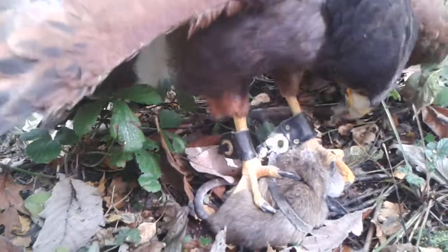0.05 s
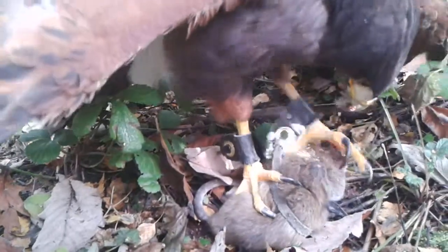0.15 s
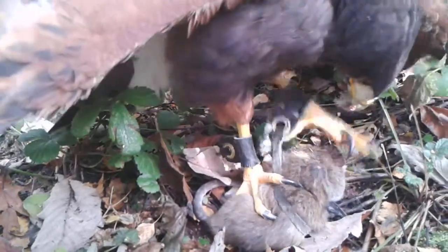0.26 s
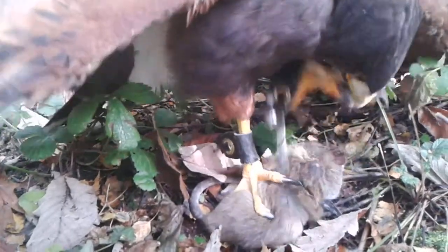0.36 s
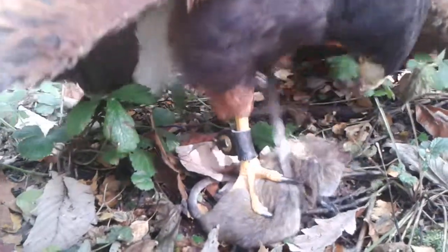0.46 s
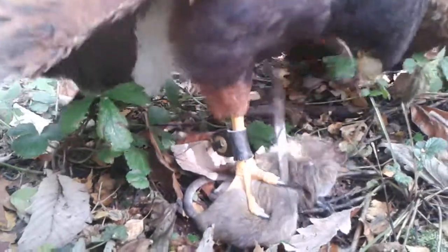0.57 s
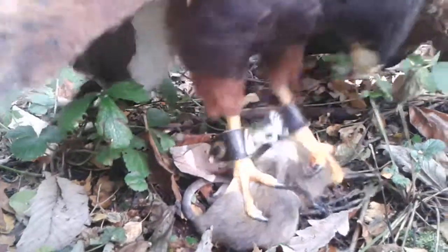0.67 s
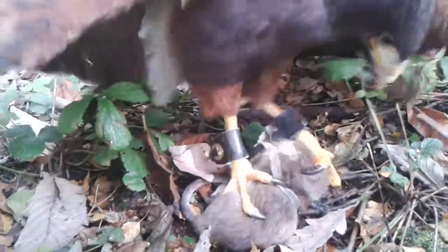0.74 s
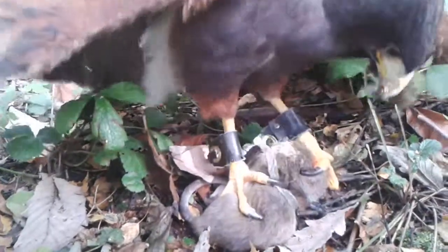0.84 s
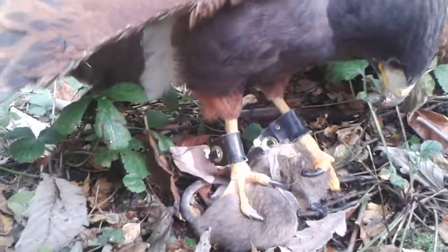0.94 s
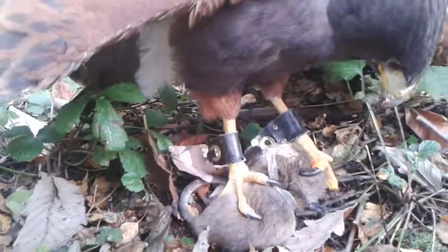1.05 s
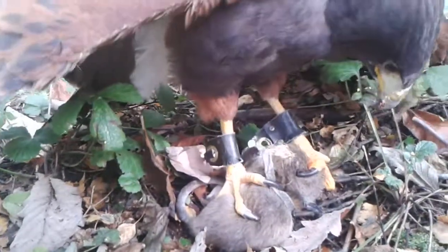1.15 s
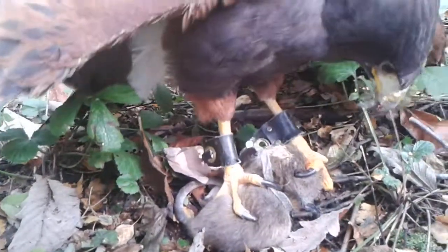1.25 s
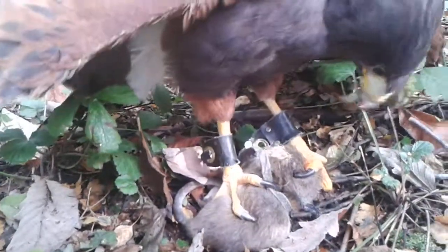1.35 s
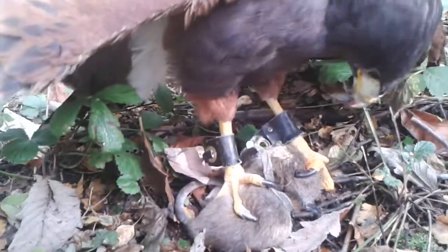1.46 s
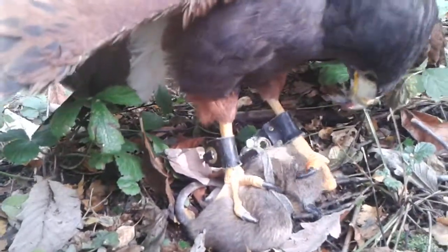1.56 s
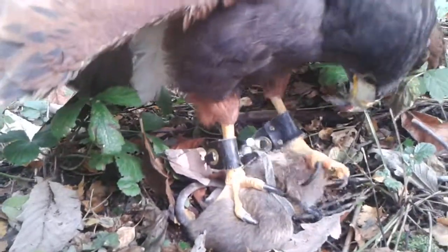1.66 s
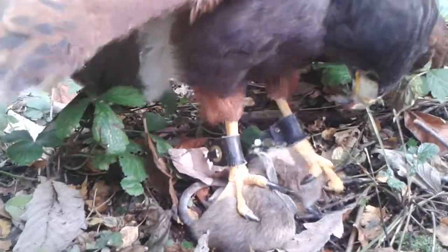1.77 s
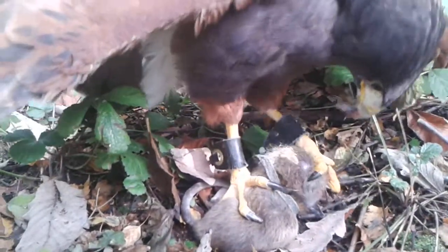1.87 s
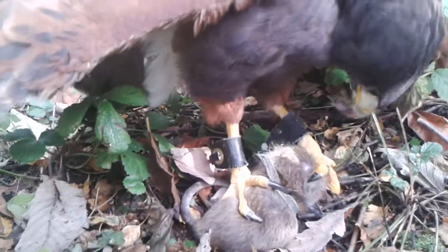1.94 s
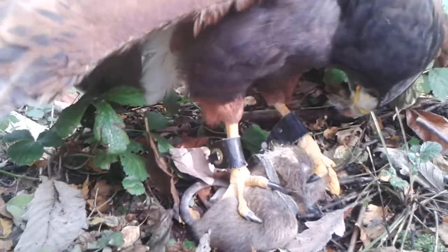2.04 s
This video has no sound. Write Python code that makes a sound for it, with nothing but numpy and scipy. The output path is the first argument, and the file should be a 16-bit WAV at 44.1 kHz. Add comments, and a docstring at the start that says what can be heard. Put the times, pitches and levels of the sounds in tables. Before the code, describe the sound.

A small slit bell on a hawk's leg jingles bright and fast, often choked, over crisp dry leaf rustle; a soft foot thud midway, near silence, then a few weaker jingles. Quiet woodland, close microphone, dry.

```python
"""A hawk shifts its feet on its prey in dry leaves, wearing a small slit bell on its leg.
Shaped noise gives the wood's faint, steady hiss; shaped clicks and noise make the leaves rustle with motion.
From 0.2 s the bell jingles: each pellet knock restarts three pairs of beating shell modes, often choked
by the leg and strap. A filtered push and noise make a foot's soft thud at 0.74 s, and later, far fainter,
a leaf's snap and a scuff. After 1.1 s the bell falls almost silent, then stirs more weakly from about 1.6 s."""
import sys
import numpy as np
from scipy import signal
from scipy.fft import rfft, irfft
from scipy.io import wavfile

SR = 44100
rng = np.random.default_rng(int(sys.argv[2]) if len(sys.argv) > 2 else 0)


def digitize_waveform(pressure):
    """Quantize a signal to 16-bit integers and store it at the path in sys.argv[1].

    Rows of a 2-D input are taken as channels; values are limited to [-1, 1].
    """
    field = np.atleast_2d(pressure).T
    bounded = np.clip(field, -1, 1)
    quanta = np.round(bounded * 32767).astype(np.int16)
    wavfile.write(sys.argv[1], SR, quanta)


N = 92610

# Background spectrum of the wood. Each row: frequency in Hz, relative level per Hz in dB.
AIR_SPECTRUM = [(30, -24.5), (160, -1.5), (330, -9), (1700, -18.5), (4500, -12.5), (16000, -37)]
AIR_DB = -58

# How strongly the bird moves. Each row: time in seconds, level in dB, joined by straight lines.
MOTION_LEVELS = [(0.109, -16.5), (.19, -8.5), (.43, -4.5), (0.69, -9.5), (0.716, 3.5), (0.821, -3),
                 (1.029, -8.5), (1.17, -17.5), (1.56, -21.5), (1.782, -8), (2.1, -19)]

# Spectrum of the leaf rustle. Each row: frequency in Hz, relative level per Hz in dB.
LEAF_SPECTRUM = [(100, -25), (500, -8), (2300, -10), (4300, 7), (9000, -15.5)]
LEAVES_DB, CRACKLES_PER_S = -41.5, 900  # the level is the rms at 0 dB of motion

# Pellet strikes on the shell. Each row: start in seconds, main mode level in dB, its upper twin's level in dB,
# overtone level in dB, knock level in dB, extra damping by the leg in dB/s (negative counts as none).
PELLET_STRIKES = [(0.2188, -36, -29.5, -51, -34, 633), (0.234, -19, -27, -49, -40, -2),
                  (0.243, -15.5, -56, -39.5, -38, 216), (0.251, -27, -46, -49, -35, 299),
                  (0.2887, -12.5, -32, -27.5, -32.5, 1995), (0.3285, -12.5, -23, -46, -25.5, 5.5),
                  (0.335, -33, -30, -36.5, -32, 31), (0.344, -6.5, -16, -29, -36, 305),
                  (0.3515, -8.5, -17, -28.5, -35, 659), (0.3575, -14, -37, -37, -25.5, 2489.5),
                  (0.394, -13, -19, -29, -30, 1397), (0.42, -16.5, -38, -27, -20, 2501),
                  (0.4364, -20.5, -40, -29, -20.5, 2503), (0.4467, -24, -44, -36, -19.5, 294),
                  (0.4556, -30.5, -21, -37.5, -26, -3.5), (0.4849, -12, -20.5, -26.5, -22, 58),
                  (0.5235, -46, -15.5, -32.5, -58, 1299.5), (0.5338, -23, -25.5, -36, -49, 501),
                  (0.563, -20.5, -47, -37.5, -32, 398), (0.5977, -24, -28, -38, -25.5, -4),
                  (0.6235, -29, -55, -38, -30, -2), (0.6357, -16.5, -20, -30.5, -49, 59.5),
                  (0.7231, -9.5, -34, -38, -29, 5), (0.7331, -47, -4, -16.5, -18, 501),
                  (0.7436, -11.5, -49, -21, -25, -6), (0.7582, -6, -14, -29.5, -14.5, 312.5),
                  (0.779, -6.5, -24, -26.5, -22.5, 1001), (0.7868, -21, -19.5, -27.5, -26.5, 636),
                  (0.827, -19.5, -40, -38, -29.5, 3), (0.8372, -20.5, -41, -30.5, -30, 5.5),
                  (0.8492, -9.5, -25, -34.5, -32, -3), (0.8566, -17, -35, -30, -22, 204),
                  (0.8647, -15, -28, -27, -24, 7), (0.9344, -12.5, -27, -33, -37, 5),
                  (0.9383, -5, -47, -34, -23, -7), (0.947, -15, -42, -30, -22, 397.5),
                  (0.9569, -12, -46, -35, -24, 27), (0.968, -15.5, -44, -39.5, -32, 1291),
                  (1.0104, -27, -49, -45.5, -35, 520), (1.0523, -28.5, -41, -62, -43, 1299),
                  (1.0605, -20, -41, -39.5, -31.5, 2009), (1.0714, -22, -34, -48, -33, 1309.5),
                  (1.6942, -20.5, -30, -40.5, -24, 403), (1.7213, -29, -39, -52, -40, 100),
                  (1.738, -26, -31, -46, -33, 654), (1.782, -28.5, -52, -65, -39, -2),
                  (1.793, -25.5, -44, -38.5, -37, 650), (1.8348, -27.5, -37, -44, -37.5, 540),
                  (1.967, -40, -55, -45.5, -38, 505), (2.0288, -36.5, -58, -50, -46, 682)]
MAIN_HZ, TWIN_HZ, RING_LOSS_DB_PER_S = 4044.3, 4249, 193

# Two pairs of higher shell modes. Each row: frequency in Hz, level in dB relative to the strike's overtones.
OVERTONE_MODES = [(8778, -9), (9165, -9.5), (14155, -3), (14700, -6.5)]
OVERTONE_LOSS_DB_PER_S, OVERTONE_DAMPED_SHARE = 322, 0.47
PAIR_CONTRAST = 0.85  # how far the place of impact favours one overtone of a pair
STIFFENING = 0.027  # a pressed shell rings sharp: Hz per dB/s of damping
CHOKE_DB = 14  # the leg presses ever harder: its damping reaches its mean rate after this drop
CONTACT_S, PHASE_KICK_RAD, DETUNE_SHARE = 0.00069, 0.761, 0.000852

# Light grazes that add to the ring without restarting it. Each row: time in seconds, level in dB.
PELLET_GRAZES = [(0.3724, -29), (0.58, -32), (0.591, -32), (0.6655, -35.5), (0.6935, -33.5),
                 (0.7072, -35.5), (0.7181, -28), (0.7494, -22.5), (1.091, -39), (1.108, -44),
                 (1.643, -48.5), (1.703, -35.5), (1.931, -46), (1.993, -39.5)]
GRAZE_HZ, GRAZE_T60_S = 4190, 0.068  # the touched shell rings sharp and briefly
GRAZE_MAIN_DB, GRAZE_OVERTONE_DB = 2, -4
RATTLE_PER_S, RATTLE_DB = 200, -47  # light touches of the rolling pellet

# Short-lived resonances of the knock. Each row: frequency in Hz, level in dB, 60 dB decay time in seconds.
KNOCK_MODES = [(3070, -1, 0.012), (3316, 4, 0.007), (3750, 2.5, 0.0079), (4495, -0.5, 0.0078)]
TICK_DB, TICK_S, KNOCK_LOW_HZ = -8.5, 0.0014, 2840
BOUNCE_S, BOUNCE_DB = 0.0056, -8  # the pellet touches again after each strike
ROLL_AT_S, ROLL_WIDTH_S = 0.605, 0.02  # the pellet tumbles briefly round the shell
ROLL_PER_S, ROLL_DB = 350, -33.5

# A foot's thud, a leaf's snap and a scuff. Each row: start in seconds, noise level in dB, fading time in seconds.
GROUND_CONTACTS = [(0.7357, -44, 0.0058), (1.464, -63, 0.0077), (1.846, -56, 0.051)]
PUSH_S, PAD_S, PUSH_LOW_HZ = 1.68, 0.00021, 70  # push = level x PUSH_S / fading time, rounded over PAD_S
NOISE_LOW_HZ, NOISE_HIGH_HZ = 295, 930

CUTOFF_HZ = 15900


def from_db(db):
    """Logarithmic level: 20 dB is a tenfold amplitude."""
    return 10 ** (np.asarray(db) / 20)


def clicks(s, gain):
    """Impulsive excitation: single samples at the given times."""
    out = np.zeros(N)
    out[(s * SR).astype(int)] = gain
    return out


def lag(x, seconds):
    """First-order relaxation: the output approaches its input exponentially."""
    r = np.exp(-1 / (seconds * SR))
    return signal.lfilter([1 - r], [1, -r], x + 1e-18)


def bursts(hits, seconds):
    """Exponential decay: each impulse releases a dying puff of noise."""
    envelope = lag(hits, seconds) * seconds * SR
    return envelope * rng.standard_normal(N)


def ring(hits, hz, t60):
    """Damped resonance: a unit click starts a decaying sine of initial height 1."""
    r = from_db(-60 / (t60 * SR))
    w = 2 * np.pi * hz / SR
    return signal.lfilter([0, np.sin(w)], [1, -2 * r * np.cos(w), r * r], hits + 1e-18)


def coloured(x, spectrum):
    """Spectral shaping: frequencies are weighted along the given curve, and the rms becomes 1."""
    hz, db = np.transpose(spectrum)
    f = np.maximum(np.arange(N // 2 + 1) * SR / N, 1)
    gain = from_db(np.interp(np.log(f), np.log(hz), db))
    y = irfft(rfft(x) * gain, N)
    return y / y.std()


def grains(per_s, spread_db):
    """Random impulse process: independent clicks of uneven size and sign."""
    sizes = from_db(spread_db * np.minimum(rng.exponential(1, N), 4))
    present = rng.random(N) < per_s / SR
    return present * sizes * rng.choice([-1, 1], N)


def air():
    """Stationary noise: the wood hisses faintly with a fixed spectrum."""
    return from_db(AIR_DB) * coloured(rng.standard_normal(N), AIR_SPECTRUM)


def leaves(motion):
    """Friction and fracture noise: dry leaves and feathers crackle as the bird moves."""
    crackle = grains(CRACKLES_PER_S, spread_db=5)
    rustle = crackle + 0.52 * rng.standard_normal(N)
    return from_db(LEAVES_DB) * motion * coloured(rustle, LEAF_SPECTRUM)


def touches(motion):
    """Light contact excitation: single grazes, and a faint rattle that sinks as the bird keeps still."""
    s, db = np.transpose(PELLET_GRAZES)
    rattle = np.minimum(motion ** 2, 1) * grains(RATTLE_PER_S, spread_db=2.0)
    return clicks(s, from_db(db)) + from_db(RATTLE_DB) * rattle


def shell_mode(hz, level_db, loss, damping):
    """Modal decay: each strike resets a mode's level and nudges phase and pitch; it dies freely or choked."""
    s, t = np.array(PELLET_STRIKES)[:, 0], np.arange(N) / SR
    last = np.maximum(np.searchsorted(s, t) - 1, 0)  # index of the latest strike
    age = np.maximum(t - s[last], 0)
    choke_db = (damping[last] * age) ** 2 / CHOKE_DB
    level = (t > s[0]) * from_db(level_db[last] - loss * age - choke_db)
    kick, detune = rng.standard_normal((len(s), 2)).T
    phase = np.cumsum(kick * PHASE_KICK_RAD * hz / MAIN_HZ)
    swing = lag(level * np.exp(1j * phase[last]), CONTACT_S)  # contact takes a short time
    pitch = hz * (1 + DETUNE_SHARE * detune) + STIFFENING * damping
    return np.real(swing * np.exp(2j * np.pi * np.cumsum(pitch[last]) / SR))


def bell(light):
    """Modal superposition: close pairs beat, strike place favours one of an overtone pair, grazes add ring."""
    s, main_db, twin_db, over_db, _, damping = np.transpose(PELLET_STRIKES)
    damping = np.maximum(damping, 0)
    out = shell_mode(MAIN_HZ, main_db, RING_LOSS_DB_PER_S, damping)
    out += shell_mode(TWIN_HZ, twin_db, RING_LOSS_DB_PER_S, damping)
    out += ring(light * from_db(GRAZE_MAIN_DB), GRAZE_HZ, GRAZE_T60_S)
    place = rng.uniform(0, 2 * np.pi, (len(s), 2))  # one angle per strike and overtone pair
    for k, (hz, db) in enumerate(OVERTONE_MODES):
        share = 1 + (-1) ** k * PAIR_CONTRAST * np.cos(place[:, k // 2])  # power share
        mode_db = over_db + db + 10 * np.log10(share)
        out += shell_mode(hz, mode_db, OVERTONE_LOSS_DB_PER_S, OVERTONE_DAMPED_SHARE * damping)
        graze = light * from_db(db + GRAZE_OVERTONE_DB) * rng.standard_normal(N)
        out += ring(graze, hz, GRAZE_T60_S)
    return out


def pellet(light):
    """Impact radiation: contacts knock and tick, rolling and bounces only knock; a small shell lacks lows."""
    s, _, _, _, knock_db, _ = np.transpose(PELLET_STRIKES)
    hits = clicks(s, from_db(knock_db)) + light
    ticks = from_db(TICK_DB) * bursts(np.abs(hits), TICK_S)
    rolling = np.exp(-((np.arange(N) / SR - ROLL_AT_S) / ROLL_WIDTH_S) ** 2)
    hits += from_db(ROLL_DB) * rolling * grains(ROLL_PER_S, spread_db=4)
    bounce_at = s + BOUNCE_S * rng.uniform(0.41, 1.4, len(s))
    hits += clicks(bounce_at, from_db(knock_db + BOUNCE_DB))
    knocks = np.zeros(N)
    for k, (hz, db, t60) in enumerate(KNOCK_MODES):
        knocks += (-1) ** k * ring(hits * from_db(db), hz, t60)  # neighbours have opposite sign
    low_cut = signal.butter(6, KNOCK_LOW_HZ, "high", fs=SR, output="sos")
    return signal.sosfilt(low_cut, knocks + ticks)


def ground_contacts():
    """Impulse and friction: thud, snap and scuff each join a push, harder the quicker it stops, to noise."""
    s, db, fade = np.transpose(GROUND_CONTACTS)
    push = lag(lag(clicks(s, from_db(db) * PUSH_S / fade), PAD_S), PAD_S)
    low_cut = signal.butter(1, PUSH_LOW_HZ, "high", fs=SR, output="sos")
    push = -signal.sosfilt(low_cut, push)
    noise = sum(bursts(clicks(at, from_db(level)), time) for at, level, time in np.array(GROUND_CONTACTS))
    band = signal.butter(2, [NOISE_LOW_HZ, NOISE_HIGH_HZ], "band", fs=SR, output="sos")
    noise = signal.sosfilt(band, noise) * np.sqrt(SR / NOISE_HIGH_HZ)  # offsets the band's loss of power
    return noise + push


def scene():
    """Linear superposition: bell, leaves and ground contacts close by add to the quiet air."""
    motion = from_db(np.interp(np.arange(N) / SR, *np.transpose(MOTION_LEVELS)))
    light = touches(motion)
    return (air() + leaves(motion) + bell(light) + pellet(light) + ground_contacts())[None]


def record(dry):
    """Band limitation: an elliptic low-pass cuts the top steeply."""
    low_pass = signal.ellip(10, 0.2, 80, CUTOFF_HZ, fs=SR, output="sos")
    return signal.sosfilt(low_pass, dry)


dry = scene()
out = record(dry)
digitize_waveform(out)
```